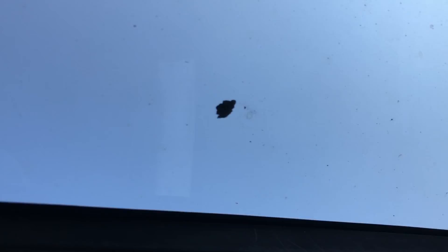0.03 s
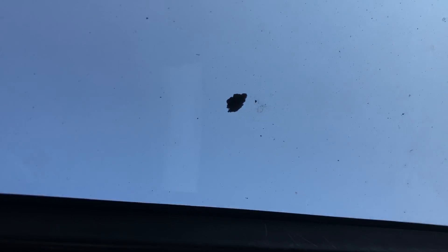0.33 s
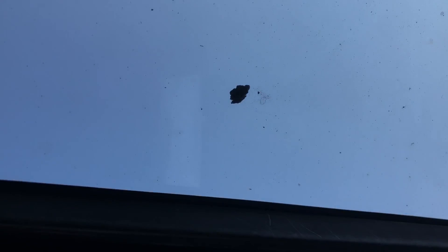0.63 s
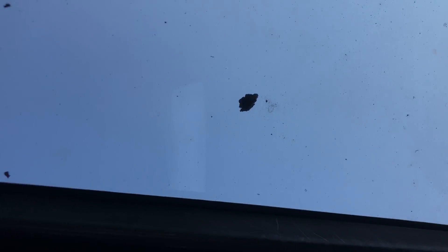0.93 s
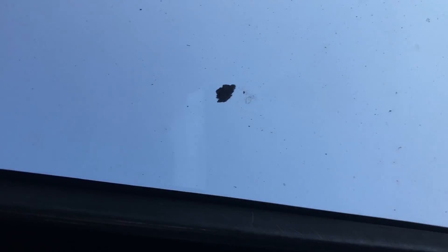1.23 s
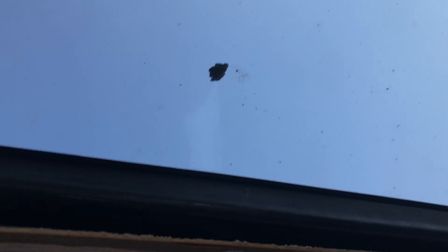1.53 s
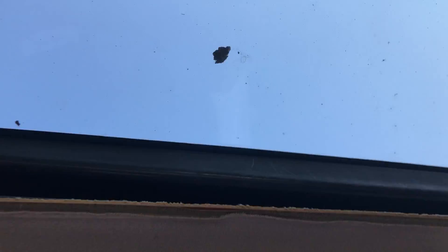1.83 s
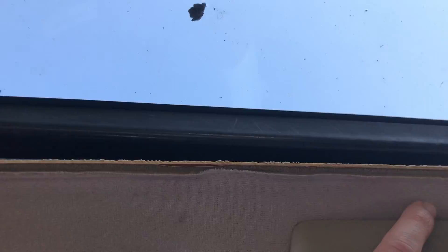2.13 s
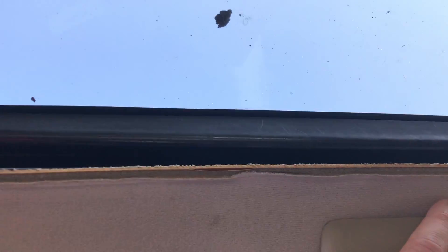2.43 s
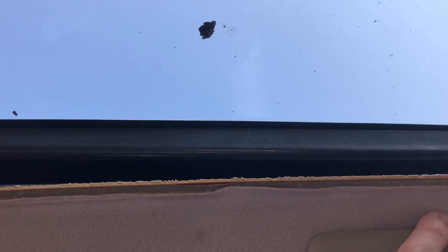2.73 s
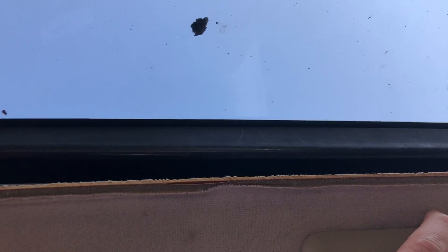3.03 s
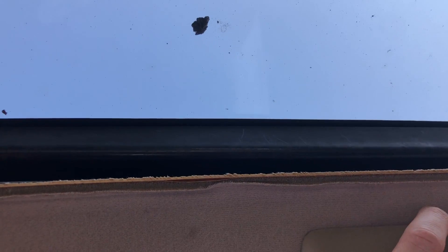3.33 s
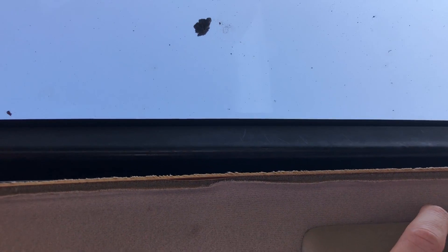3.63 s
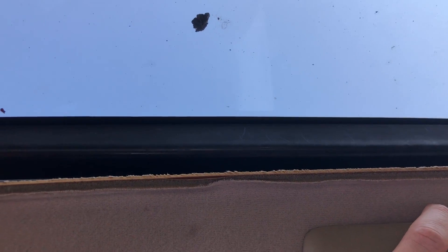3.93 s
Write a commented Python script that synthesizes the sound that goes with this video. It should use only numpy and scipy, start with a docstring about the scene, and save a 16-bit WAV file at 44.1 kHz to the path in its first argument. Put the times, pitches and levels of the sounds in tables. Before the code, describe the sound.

Heard close inside a quiet parked car, an electric window starts with a switch knock and whirs, its pitch sagging. A pause holds light clicks, low hum and a faint high trill before a second, shorter run.

```python
"""A switch knocks and an electric window starts to whine inside a parked car.
It runs twice: the motor's pitch sags under load while the glass hisses through its seals.
Switch and lifter knock in the door, and a hand bumps the microphone and brushes the trim.
In the pauses there is a low hum and a faint, high, insect-like trill."""
import sys
import numpy as np
from scipy import signal
from scipy.fft import rfft, irfft
from scipy.io import wavfile

SR = 44100
rng = np.random.default_rng(int(sys.argv[2]) if len(sys.argv) > 2 else 0)


def store_pcm(level_fs):
    """Save levels as 16-bit WAV."""
    pcm = np.round(np.clip(level_fs, -1, 1) * 32767).astype(np.int16)
    wavfile.write(sys.argv[1], SR, np.atleast_2d(pcm).T)


N = 176400
T = np.arange(N) / SR

# each trip of the glass: start_s, stop_s, run_down_s, hiss_db, rumble_db, rumble_db_per_s, boom_db
WINDOW_RUNS = [(-.1, 1.475, 0.018, -52, -42.5, -3, -60), (3.152, 3.536, 0.26, -52, -45.5, 1.5, -47)]
# tone colour of the glass in its seals, and of the gears and cable: frequency_hz, level_db
SEAL_COLOUR = [(500, -10.5), (1000, 1.5), (1330, 1.5), (1420, -5.5), (1600, -1.5), (2000, -4), (2400, -3),
               (2950, -8.5), (3400, -6.5), (3850, -10), (4400, -8.5), (4750, -9.5), (5400, -7),
               (7100, -10.5), (8200, -14.5), (10400, -18.5), (11400, -21.5), (12500, -18.5), (15800, -22.5)]
GEAR_COLOUR = [(30, -13), (70, -10.5), (110, -9), (160, 1), (200, -9), (250, 2), (345, -8.5), (440, -4),
               (600, -15), (860, -8.5), (1100, -26), (1500, -20.5), (3000, -67)]
# narrow bands that the sliding glass sets ringing: pitch_hz, width_hz, level_db
GLASS_RESONANCES = [(2620, 40, -29.5), (4535, 70, -22.5), (5300, 93, -22.5), (6330, 100, -24),
                    (8270, 56, -27), (11350, 640, -23)]
# extra hiss where the seal drags: time_s, boost_db
SEAL_DRAG = [(.44, 0.4), (.54, 2), (.59, 0), (1.05, 0.7), (1.24, 2), (1.42, 1)]
# the motor's whine on each run: time_s, pitch_hz, level_db
FIRST_WHINE = [(0, 800.5, -41.5), (.05, 813.7, -44), (.12, 847.4, -41.5), (.23, 885.3, -40),
               (.31, 906.5, -45.5), (.40, 878, -40), (.45, 826, -42), (.53, 711.3, -58), (.59, 766, -51),
               (.67, 803, -45), (.77, 808.3, -45.5), (1.0, 780.4, -49), (1.22, 744.4, -49),
               (1.46, 667, -58.5), (1.5, 561.6, -85)]
SECOND_WHINE = [(3.16, 516.4, -31.5), (3.18, 574, -39), (3.205, 621, -38.5), (3.222, 803, -47.5),
                (3.26, 867, -41), (3.31, 884, -43), (3.36, 918, -44.5), (3.42, 944, -45.5),
                (3.54, 945, -51.5), (3.58, 902, -79.5)]
# tones of the spinning rotor: cycles_per_turn, level_db
ROTOR_TONES = [(3, -17.5), (7, -14), (10, -27), (12, 0), (13, -24.5), (14, -25.5), (19, -32), (24, -22.5),
               (36, -33), (72, -29)]
# tone colour of the cabin air and of the hand's rumble: frequency_hz, level_db
CABIN_COLOUR = [(18, -61), (35, -22), (70, -8), (100, -24.5), (205, -19.5), (340, -23.5), (670, -29),
                (900, -28.5), (1550, -34), (2800, -43), (3600, -42.5), (6500, -52.5), (9000, -50),
                (12000, -66), (15800, -52)]
HAND_COLOUR = [(15, -21), (32, -3), (50, -3), (90, -9.5), (200, -8), (400, -28.5), (1500, -53)]
# rumble of the moving hand: time_s, level_db
HAND_LEVELS = [(0, -40.5), (.3, -44), (.45, -42.5), (.68, -47.5), (.8, -67), (.95, -55), (1.25, -55.5),
               (1.6, -62.5), (2.2, -57), (2.6, -65.5), (4, -64.5)]
# soft low bumps through hand and door: start_s, level_db, pitch_hz
BUMPS = [(.008, -26, 63.5), (0.225, -34, 154), (.35, -30, 51.3), (0.379, -30, 104), (0.414, -36.5, 165),
         (0.568, -29, 55), (0.575, -30.5, 137.8), (1.86, -51.5, 139), (2.385, -38, 159),
         (3.562, -34.5, 152)]
# knocks of switch, lifter and glass: start_s, ring_db, thud_db, click_db
KNOCKS = [(0.0222, -23.5, -35, -32.5), (0.1185, -39, -37.5, -66), (0.1568, -49, -62, -36.5),
          (0.213, -39.5, -48, -35), (0.2176, -29.5, -40, -58), (0.4226, -31.5, -43, -40.5),
          (1.4668, -42.5, -47, -39), (1.4941, -48.5, -45, -53), (1.65, -51.5, -52, -59),
          (1.697, -57, -82, -50), (1.845, -54, -54.5, -56.5), (2.0388, -56, -52.5, -49),
          (2.1322, -37.5, -41.5, -41), (2.142, -44, -37.5, -52), (2.1803, -50, -52, -56),
          (2.361, -50, -52, -37.5), (2.364, -28, -39, -31), (2.3687, -28, -43.5, -48),
          (2.4725, -49.5, -46.5, -58), (2.9732, -57, -59, -57), (3.03, -54, -48.5, -52.5),
          (3.128, -53, -45.5, -41.5), (3.147, -45, -41, -33), (3.159, -17, -31.5, -38),
          (3.1641, -28, -24.5, -45), (3.178, -39, -34, -40), (3.2, -48, -44, -53), (3.227, -48, -42.5, -40),
          (3.241, -45, -46, -39), (3.546, -28.5, -33, -29), (3.5492, -25.5, -43, -47),
          (3.745, -65, -55.5, -55)]
# notes of the struck door and trim: pitch_hz, level_db, fade_s (time to fall by 60 dB)
DOOR_NOTES = [(85.6, -11.5, 0.48), (161.7, -5.5, 0.19), (236.4, -8.5, 0.08), (341, 3.5, 0.045),
              (450, -10, 0.13), (560, -4, 0.071)]
TRIM_NOTES = [(700.5, -18, 0.084), (802, -4.5, 0.044), (903, 0.5, 0.026), (1023, -6.5, 0.035),
              (1214, -8.5, 0.036), (1560, -14.5, 0.011), (1665, -16, 0.03), (1900, -23, 0.028)]
# tone colour of a knock's click and of the panels ringing after it: frequency_hz, level_db
CLICK_COLOUR = [(300, 5.5), (1200, 7.5), (2500, 1.5), (4500, -3.5), (5600, -10.5), (7000, -11.5),
                (11000, -16), (16000, -29)]
PANEL_COLOUR = [(100, -25), (220, 9), (500, -5), (900, -2.5), (1250, -9), (1800, -15), (4000, -39)]
# early echoes in the cabin: delay_s, level_db
ECHOES = [(.0043, -9.5), (.0079, -12), (0.012, -9), (0.0198, -14), (0.028, -21), (0.0406, -38)]
# ticks of plastic and grit: start_s, level_db, pitch_hz, width_hz, fade_s
TICKS = [(.118, -30.5, 1600, 550, .024), (0.2122, -32.5, 10300, 7300, .02),
         (0.4228, -37, 3230, 3570, 0.011), (1.595, -65, 10140, 9000, .017), (1.852, -61, 9400, 8000, .045),
         (2.3622, -35, 5544, 747, 0.029), (2.525, -64, 9000, 9000, .017), (3.1521, -39, 7020, 900, 0.0093),
         (3.2425, -40, 1650, 300, 0.032), (3.2755, -36.5, 6900, 600, 0.012),
         (3.546, -30.5, 2170, 350, 0.022)]
# rubs of the rubber seal: start_s, peak_s, stop_s, pitch_hz, width_hz, level_db
RUBS = [(.43, 0.536, 0.58, 2780, 1100, -55.5), (.55, 1.35, 1.4, 11380, 650, -70.5),
        (3.15, 3.35, 3.74, 11450, 800, -66)]
# rows of chirps in the trill: start_s, stop_s, pitch_hz, chirps_per_s, level_db
CHIRP_ROWS = [(1.465, 2.32, 7650, 13.9, -80), (2.8, 4, 7640, 13.5, -85), (1.4, 4, 7365, 22, -83.5),
              (1.4, 4, 8050, 21, -85.5)]
# the hand's stroke over the trim: time_s, level_db
BRUSH_LEVELS = [(1.96, -73), (1.99, -60), (2.07, -56), (2.13, -62), (2.26, -72.5), (2.35, -73.5)]
# tone colour of that stroke: frequency_hz, level_db
BRUSH_COLOUR = [(60, -22), (200, -11.5), (700, -11), (2000, -16), (6000, -18.5), (15000, -26.5)]
# whirs of the coasting gears: start_s, length_s, start_hz, end_hz, level_db
WHIRS = [(3.555, 0.081, 1310, 1183, -53), (3.596, 0.0507, 1260, 954, -52), (3.64, 0.0536, 1312, 920, -54.5)]


def from_db(db):
    """Turn decibels into a number to multiply by."""
    return 10 ** (np.asarray(db) / 20)


def unit_level(x):
    """Scale a sound so that its average strength (rms) is 1."""
    return x / np.sqrt(np.mean(x ** 2) + 1e-20)


def in_time(rows):
    """Join timed points with straight lines, giving one curve per value column."""
    times, *columns = np.transpose(rows)
    return [np.interp(T, times, column) for column in columns]


def noise(colour):
    """Steady noise with the given tone colour."""
    hz, db = np.transpose(colour)
    bins_hz = np.arange(N // 2 + 1) * SR / N
    gain = from_db(np.interp(np.log(bins_hz + 1e-9), np.log(hz), db)) * (bins_hz > 22)
    return unit_level(irfft(rfft(rng.standard_normal(N)) * gain, N))


def drift(rate_hz):
    """A smooth random wobble, about 1 in size."""
    r = np.exp(-2 * np.pi * rate_hz / SR)
    return unit_level(signal.lfilter([1], [1, -2 * r, r * r], rng.standard_normal(N + SR))[SR:])


def narrow_noise(hz, width_hz):
    """Noise in one band around a pitch."""
    edges_hz = np.clip([hz - width_hz / 2, hz + width_hz / 2], 20, .45 * SR)
    band = signal.butter(2, edges_hz, "band", fs=SR, output="sos")
    return unit_level(signal.sosfilt(band, rng.standard_normal(N)))


def impulses(times, db):
    """One spike at each of the given times."""
    out = np.zeros(N)
    np.add.at(out, np.clip(np.atleast_1d(times) * SR, 0, N - 1).astype(int), from_db(db))
    return out


def fading(spikes, fade_s, rise_s=.00092):
    """A loudness curve that jumps up at each spike and dies away."""
    r = np.exp(-1 / (rise_s * SR))
    rounded = signal.lfilter([1 - r], [1, -r], spikes + 1e-18)
    return signal.lfilter([1], [1, -from_db(-60 / (fade_s * SR))], rounded + 1e-18)


def struck(times, db, notes, spread_db):
    """Each blow rings all of a part's notes, each with a slightly random strength."""
    out = np.zeros(N)
    for k, (hz, note_db, fade_s) in enumerate(notes):
        r, w = from_db(-60 / (fade_s * SR)), 2 * np.pi * hz / SR
        spikes = impulses(times, db + note_db + spread_db * rng.standard_normal(len(times)))
        out += (-1) ** k * signal.lfilter([0, np.sin(w)], [1, -2 * r * np.cos(w), r * r], spikes + 1e-18)
    return out


def sliding_window(run_up_s=.07):
    """While the glass moves, the seals hiss, the gears rumble and the door booms."""
    hiss = noise(SEAL_COLOUR)
    hiss += sum(from_db(db) * narrow_noise(hz, width) for hz, width, db in GLASS_RESONANCES)
    hiss *= from_db(.74 * drift(120) + in_time(SEAL_DRAG)[0])  # the fast wobble makes it grainy
    rumble = noise(GEAR_COLOUR) * from_db(-drift(24.4))
    boom = narrow_noise(hz=132, width_hz=125)
    out = np.zeros(N)
    for start, stop, run_down_s, hiss_db, rumble_db, db_per_s, boom_db in WINDOW_RUNS:
        fade_in = np.clip((T - start) / run_up_s + .5, 0, 1)
        fade_out = np.clip(1 - (T - stop) / run_down_s, 0, 1) ** 1.22
        gears = from_db(rumble_db + db_per_s * np.clip(T - start, 0, 2)) * rumble
        out += fade_in * fade_out * (from_db(hiss_db) * hiss + gears + from_db(boom_db) * boom)
    return out


def motor(whine, slots=12, door_hz=1760, door_width_hz=120):
    """The rotor's tones share one unsteady speed; each swells as it crosses a pitch the door rings at."""
    hz, db = in_time(whine)
    unsteady_hz = hz * (1 + .003 * drift(42))
    rotor_angle = 2 * np.pi * np.cumsum(unsteady_hz) / SR / slots  # one cycle of whine per rotor slot
    tones = np.zeros(N)
    for per_turn, tone_db in ROTOR_TONES:
        swell_db = 5 / (1 + (2 * (per_turn * hz / slots - door_hz) / door_width_hz) ** 2)
        gain = from_db(tone_db + swell_db + .9 * drift(25))
        tones += gain * np.sin(per_turn * rotor_angle + rng.uniform(0, 2 * np.pi))
    running = (T >= whine[0][0]) * (T < whine[-1][0])
    return np.sqrt(2) * from_db(db - 1) * tones * running


def cabin(hum_hz=68, hum_db=-63.5, air_db=-63.3):
    """Quiet cabin air and a low hum that wanders in loudness and pitch."""
    gain = np.sqrt(2) * from_db(hum_db + 3 * drift(2.7))
    hz = hum_hz * (1 + .046 * drift(5.7))
    hum = gain * np.sin(2 * np.pi * np.cumsum(hz) / SR)
    return hum + from_db(air_db) * noise(CABIN_COLOUR)


def hand_bumps(rise_s=.0082):
    """A moving hand makes a low rumble and soft bumps at the microphone."""
    out = from_db(in_time(HAND_LEVELS)[0]) * noise(HAND_COLOUR)
    for start, db, hz in BUMPS:
        age = np.maximum(T - start, 0)
        swell = age / rise_s * np.exp(1 - age / rise_s)
        out += from_db(db) * swell * np.sin(2 * np.pi * hz * age)
    return out


def knocks(thud_delay_s=.00222):
    """Parts click as they meet; the trim rings, the door thuds and the panels ring on in a blur."""
    times, ring_db, thud_db, click_db = np.transpose(KNOCKS)
    click = noise(CLICK_COLOUR) * fading(impulses(times, click_db), fade_s=.032)
    panels = noise(PANEL_COLOUR) * fading(impulses(times, ring_db - 19), fade_s=.19)
    ring = struck(times, ring_db, TRIM_NOTES, spread_db=1)
    thud = struck(times + thud_delay_s, thud_db, DOOR_NOTES, spread_db=3)
    return click + panels + ring + thud


def echoes(sound, cutoff_hz=1030):
    """Sound bounces off glass and roof and comes back as a few dull copies."""
    copies = sum(from_db(db) * np.interp(T - delay, T, sound, left=0) for delay, db in ECHOES)
    return signal.sosfilt(signal.butter(2, cutoff_hz, fs=SR, output="sos"), copies)


def ticks():
    """Plastic and grit give off short, bright bursts of noise."""
    return sum(narrow_noise(hz, width) * fading(impulses(start, db), fade_s)
               for start, db, hz, width, fade_s in TICKS)


def seal_rubs():
    """The rubbed rubber sings in a narrow band, swelling and fading."""
    return sum(from_db(db) * np.interp(T, [start, peak, stop], [0, 1, 0]) * narrow_noise(hz, width)
               for start, peak, stop, hz, width, db in RUBS)


def trill(haze_db=-84.5):
    """Rows of short, high chirps, each row at its own pitch and pace, over a steady haze."""
    out = from_db(haze_db) * narrow_noise(hz=7650, width_hz=800)
    for start, stop, hz, per_s, db in CHIRP_ROWS:
        beat = per_s * (T - start) + .1 * drift(3)
        pulses = np.sin(np.pi * beat) ** 6 * (T > start) * (T < stop)
        blurred_hz = hz * (1 + .005 * drift(90))
        tone = np.sin(2 * np.pi * np.cumsum(blurred_hz) / SR)
        out += 2 * from_db(db + 2 * drift(3)) * pulses * tone
    return out


def hand_brush():
    """A hand slides over the trim with one soft swish."""
    return from_db(in_time(BRUSH_LEVELS)[0]) * noise(BRUSH_COLOUR)


def coasting_gears():
    """Short whirs fall in pitch as the gears lose speed."""
    out = np.zeros(N)
    for start, length, start_hz, end_hz, db in WHIRS:
        progress = np.clip((T - start) / length, 0, 1)
        hz = start_hz + (end_hz - start_hz) * progress
        out += from_db(db) * np.sin(np.pi * progress) * np.sin(2 * np.pi * np.cumsum(hz) / SR)
    return out


def scene():
    """All the sounds meet at one microphone, the same in both channels."""
    blows = knocks() + ticks()
    drive = motor(FIRST_WHINE) + motor(SECOND_WHINE) + coasting_gears()
    glass = sliding_window() + seal_rubs()
    hand = hand_bumps() + hand_brush()
    mono = blows + echoes(blows) + drive + glass + hand + cabin() + trill()
    return np.stack([mono, mono])


def record(dry, cutoff_hz=15800):
    """The very highest treble is cut off steeply."""
    return signal.sosfilt(signal.ellip(10, .1, 70, cutoff_hz, fs=SR, output="sos"), dry)


dry = scene()
out = record(dry)
store_pcm(out)
```